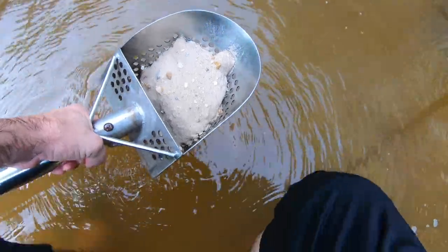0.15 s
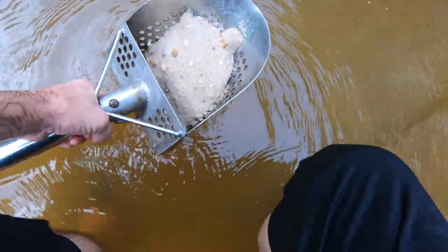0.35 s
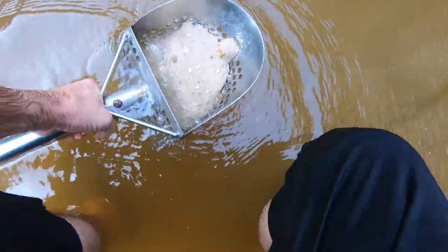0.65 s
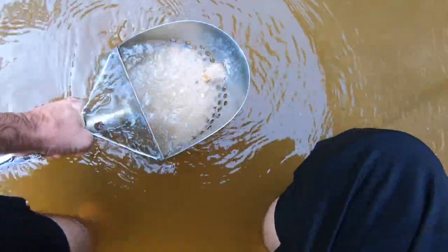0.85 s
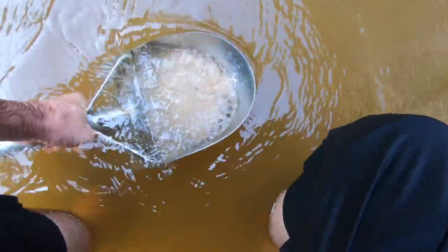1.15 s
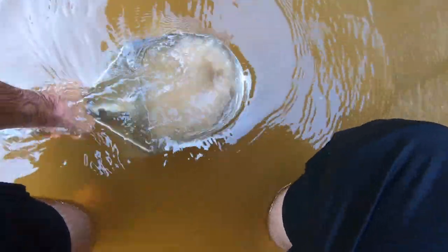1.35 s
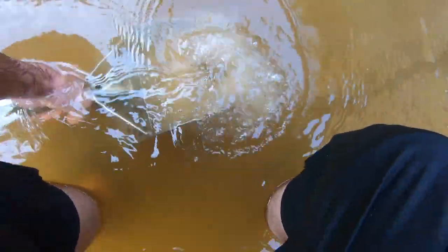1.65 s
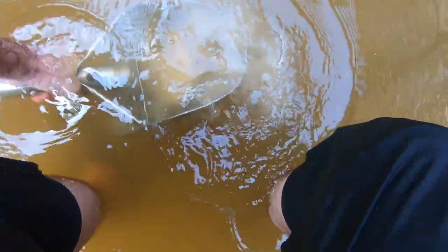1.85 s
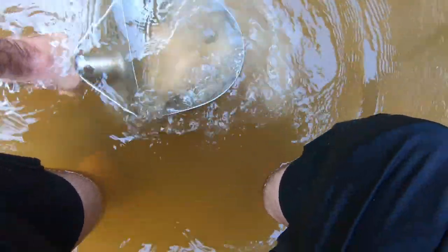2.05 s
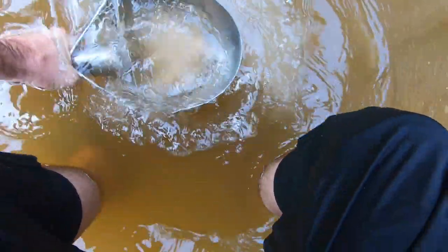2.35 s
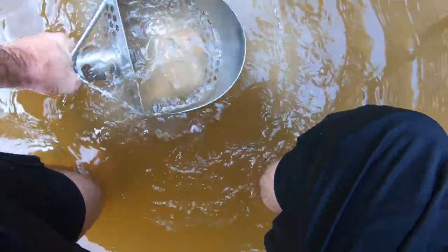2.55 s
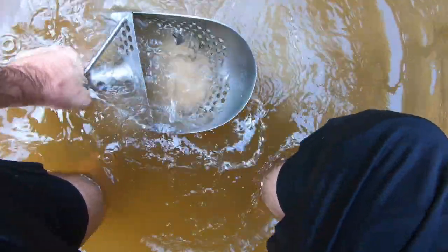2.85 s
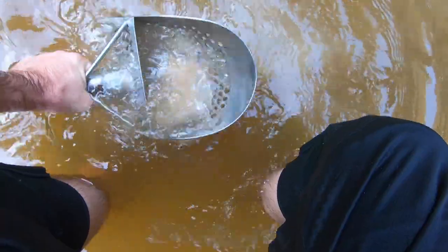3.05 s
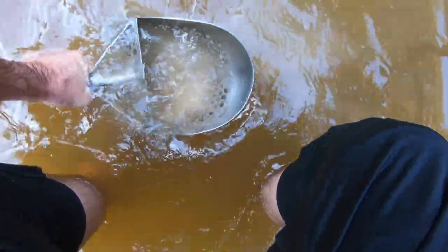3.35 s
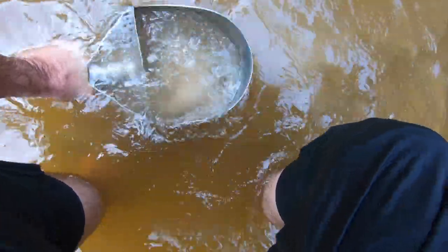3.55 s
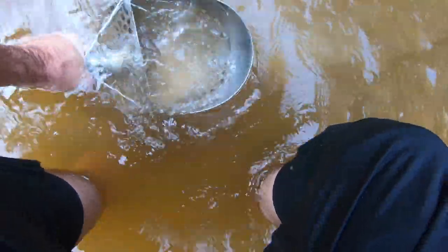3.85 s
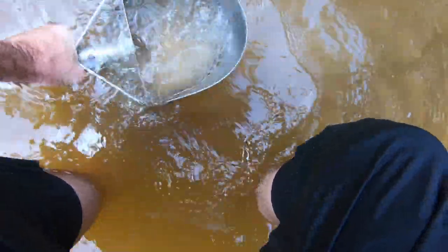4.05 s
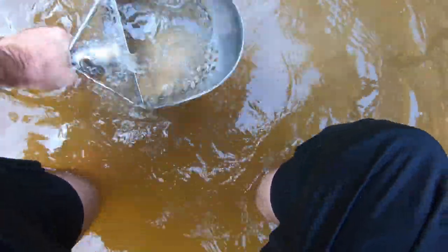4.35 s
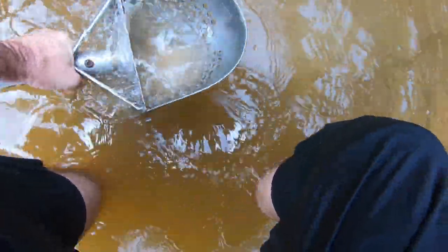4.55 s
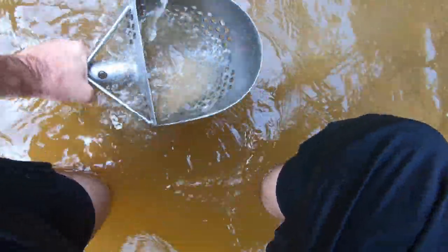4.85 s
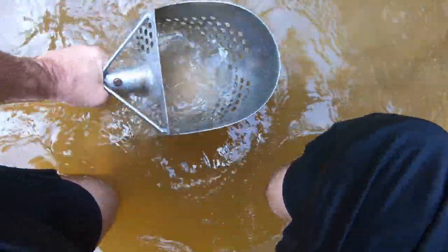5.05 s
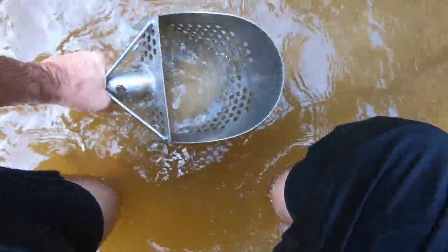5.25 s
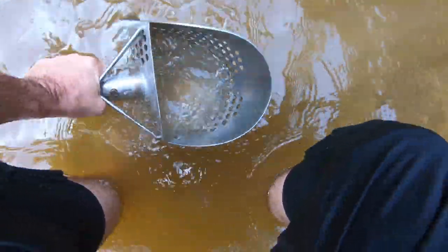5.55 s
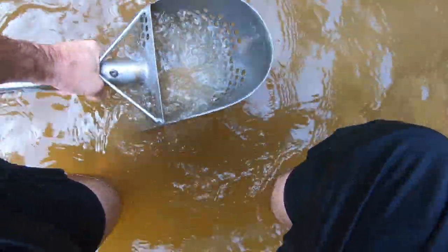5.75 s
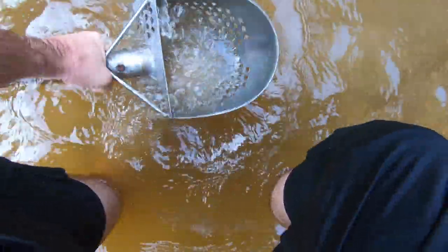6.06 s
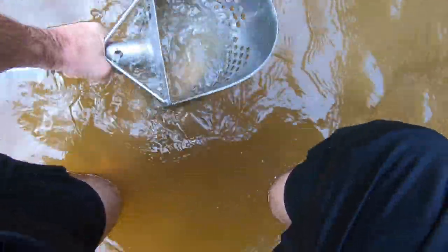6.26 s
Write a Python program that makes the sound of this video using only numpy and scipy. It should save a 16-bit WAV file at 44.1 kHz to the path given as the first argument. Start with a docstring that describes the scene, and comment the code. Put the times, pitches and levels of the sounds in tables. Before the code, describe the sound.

Outdoors, very close over shallow water. A small bird whistles briefly above faint trickles, plops and pebble ticks. After a quieter moment, trapped air gives a low falling gulp as a steel scoop goes under. Then rapid shaking begins, about eight strokes a second, each a gritty wet swish with bubbles and clicks. As the sand washes out, the scoop sounds emptier and brighter, with small metallic pings. Close stereo from a small camera, thin bass and dulled top treble.

```python
"""Outdoors in shallow water, close under a small camera with two microphone ports: a steel scoop of sand.
First a bird whistles (gliding sines) in the quiet air (shaped noise), over trickles, plops and pebble ticks.
At 1.5 s trapped air gulps (fading, gliding sines) as the scoop goes under. From 2 s it is shaken to the end:
each stroke slides sand along the perforated shell (grainy noise through resonances) among bubbles (dying
sines) and ticks (noise bursts). From 3.5 s the shell empties fast: its drum rises and bare steel pings."""
import sys
import numpy as np
from scipy import signal
from scipy.fft import rfft, irfft, next_fast_len
from scipy.io import wavfile

SR = 44100
rng = np.random.default_rng(int(sys.argv[2]) if len(sys.argv) > 2 else 0)


def wav_out(sig):
    """Save sig, one row per channel (or a flat mono array), as 16-bit PCM at SR to the path in sys.argv[1]."""
    wavfile.write(sys.argv[1], SR, np.round(np.clip(np.atleast_2d(sig).T, -1, 1) * 32767).astype(np.int16))


N = 283122
T = np.arange(N) / SR  # s
BINS = np.fft.rfftfreq(next_fast_len(N + SR // 4, real=True) // 2 * 2, 1 / SR)  # Hz, with room for tails


def undb(db):
    """Gain of a level in dB."""
    return 10 ** (np.asarray(db) / 20)


def unit(x):
    """Scale to rms 1."""
    return x / np.sqrt(np.mean(x ** 2))


def over_time(table):
    """Read a (start_s, value) table at every sample."""
    return np.interp(T, *np.transpose(table))


def along(table):
    """Read a (pitch_hz, value) table at every frequency bin."""
    hz, value = np.transpose(table)
    return np.interp(np.log(BINS + 1), np.log(hz + 1), value)


def shape(x, response):
    """Apply a frequency response given at every bin."""
    size = 2 * len(BINS) - 2
    return irfft(rfft(x, size) * response, size)[..., :N]


def add(out, s, x, pan_db):
    """Lay a short sound into both channels, pan_db louder on the left than on the right."""
    i = int(s * SR)
    x = x[..., :N - i]
    out[:, i:i + x.shape[-1]] += x * undb(np.array([[pan_db / 2], [-pan_db / 2]]))


def flicker(per_s, depth_db):
    """A gain that wanders: random levels joined by straight lines in dB."""
    knots = rng.standard_normal(int(T[-1] * per_s) + 2)
    return undb(depth_db * np.interp(T * per_s, np.arange(len(knots)), knots))


def decaying(knocks, tail_s):
    """Give each knock an exponential tail that falls to 1/e in tail_s."""
    return signal.lfilter([1], [1, -np.exp(-1 / (tail_s * SR))], knocks)


# colour of the open air: pitch_hz [Hz], level_db [dB per Hz, relative]
AIR_COLOUR = [(15, -43), (25, 4), (91, -43), (223, 1), (437, 1), (1070, -41.5), (1360, 1), (1510, -22),
              (2460, -40), (8760, 22), (15900, -40)]


def air():
    """The quiet outdoor hush: noise with a fixed colour, as two unrelated streams."""
    return undb(-68) * unit(shape(rng.standard_normal((2, N)), undb(along(AIR_COLOUR))))


def tones(tracks):
    """Sines that follow (start_s, pitch_hz, level_db) tracks."""
    out = np.zeros(N)
    for s, hz, db in map(np.transpose, tracks):
        on = (T >= s[0]) & (T < s[-1])
        phase = 2 * np.pi * np.cumsum(np.interp(T[on], s, hz)) / SR
        out[on] += np.sqrt(2) * undb(np.interp(T[on], s, db)) * np.sin(phase)
    return out


# bird whistles, one track each: start_s [s], pitch_hz [Hz], level_db [dB rms]
WHISTLES = [
    [(.022, 3140, -56), (.03, 3140, -47), (.05, 2875, -44), (.068, 3200, -46), (.082, 3480, -42),
     (.105, 2610, -51), (.122, 2630, -43), (.135, 2300, -52), (.15, 2220, -50)],
    [(.308, 2400, -62), (.315, 2410, -42), (.335, 2370, -51), (.345, 2300, -62)],
    [(.47, 2400, -54), (.478, 2570, -48), (.495, 3250, -52), (.507, 3650, -51), (.52, 2950, -50),
     (.535, 2640, -45), (.55, 2670, -44), (.56, 2800, -60)],
    [(.6, 3020, -56), (.61, 2990, -47), (.62, 2800, -56)],
    [(.705, 2620, -54), (.715, 2710, -44), (.728, 3020, -53), (.735, 3020, -61)],
    [(.655, 2350, -58), (.665, 2400, -48), (.68, 2450, -56)],
]


def bird():
    """Gliding whistles with a faint smear of echoes from the banks: noise that dies exponentially."""
    call, t = tones(WHISTLES), np.arange(int(.25 * SR)) / SR
    echo = rng.standard_normal((2, len(t))) * np.exp(-t / .06)
    out = np.array([call, call])
    add(out, .01, undb(-40) * signal.fftconvolve(call[None, :SR], echo, axes=1), 0)
    return out


# air pockets that gulp as they open: start_s [s], length_s [s], first_pitch_hz [Hz], last_pitch_hz [Hz],
# level_db [dB rms before the fade], fade_db [dB over the length], attack_s [s]
POCKETS = [(1.5105, 0.11, 363.5, 302, -16, -31.5, 0.0036), (1.617, 0.062, 304, 513, -33, -8, 0.012),
           (1.689, 0.062, 460, 690, -47.5, -14, 0.014), (1.618, 0.11, 400, 1466, -37.5, -24.5, 0.0061),
           (1.66, 0.044, 555, 690, -38.5, -13, 0.012), (1.706, 0.035, 692, 900, -50, -3, .018),
           (1.6, 0.041, 674, 877, -52.5, -6, 0.016), (1.892, 0.026, 374, 305, -44.5, -4, 0.024),
           (1.92, 0.028, 330, 370, -51.5, -7, 0.0099), (.226, 0.019, 793, 1780, -40.5, -5, 0.0042),
           (1.088, 0.025, 1300, 3620, -52.5, 4, .012), (1.362, 0.044, 1000, 808, -42.5, -27, 0.011),
           (1.972, 0.0132, 1080, 1650, -36.5, -1.5, 0.007), (1.974, .012, 2700, 2250, -41, -6, .005),
           (1.975, 0.013, 2390, 1690, -30.5, -20, 0.0054), (2.16, 0.028, 503, 640, -30, -12, .01),
           (2.163, 0.017, 1450, 1780, -27, -9, 0.0066), (4.952, 0.05, 2880, 2560, -46, 3, .01),
           (5.923, 0.049, 1670, 1660, -36, -6, 0.0051)]
RISE_BEND, FALL_BEND = 1.3, 0.45  # upward glides speed up, downward ones settle early
CLOSE_S = 0.0019  # ending time


def gulps():
    """Each pocket sounds a sine that starts, fades and glides as the pocket changes size."""
    out, wobble = np.zeros((2, N)), flicker(70, 0.84)
    for s, length, first_hz, last_hz, db, fade_db, attack in POCKETS:
        t = np.arange(int(length * SR)) / SR
        bend = RISE_BEND if last_hz > first_hz else FALL_BEND
        hz = first_hz * (last_hz / first_hz) ** ((t / length) ** bend)
        opening = np.sin(np.minimum(t / attack, 1) * np.pi / 2) ** 2
        closing = np.minimum((length - t) / CLOSE_S, 1)
        level = np.sqrt(2) * undb(db + fade_db * np.maximum(t - attack, 0) / length) * opening * closing
        level = level * wobble[int(s * SR):][:len(t)] ** (t / length)  # the pocket sputters more and more
        add(out, s, level * np.sin(2 * np.pi * np.cumsum(hz) / SR), 0)
    return out


def plop(hz, t60, glide):
    """A pinched-off bubble: a dying sine whose pitch glides near the surface; fast gliders swell first."""
    t = np.arange(int(t60 * SR) + 2) / SR
    gliding_hz = np.minimum(hz * 2 ** (glide * t / .01), 12000)
    swell = np.minimum(t / (0.00011 + 0.026 * abs(glide)), 1)
    return np.sin(2 * np.pi * np.cumsum(gliding_hz) / SR) * 1000 ** (-t / t60) * swell


# clear bubbles: start_s [s], level_db [dB, peak before decay and swell], pitch_hz [Hz],
# pan_db [dB, left minus right], t60_s [s to fade 60 dB, at least 0.004], glide [octaves per 10 ms]
PLOPS = [(0.23, -27, 2640, 1.1, 0.0062, 0.01), (0.283, -36, 2980, -2, 0.016, 0.01),
         (0.318, -26.5, 3200, 6, 0.016, 0.09), (0.615, -29.5, 2140, -1.0, 0.023, -0.056),
         (0.6357, -21.5, 2900, 2, 0.014, 0.01), (0.637, -21, 892, 1, 0.047, -0.088),
         (0.676, -42, 833, 2.7, 0.067, 0.01), (0.704, -41, 840, -1.3, 0.086, 0.04),
         (0.736, -28, 5070, 6.4, 0.011, 0.01), (0.7407, -20.5, 2600, 0.9, 0.017, 0.077),
         (0.788, -25, 2860, 2.6, 0.018, 0.01), (0.8, -36, 1560.0, 1, 0.031, 0.01),
         (0.812, -22, 3040, 1, 0.015, 0.01), (0.8475, -26.5, 3080, 2.5, 0.019, 0.083),
         (0.939, -32, 2540.0, -1.5, 0.014, 0.01), (1.343, -31.5, 2140, 1, 0.018, 0.0026),
         (1.36, -37, 3480, 7, 0.011, 0.01), (1.363, -36, 1570, 4, 0.043, 0.065),
         (1.423, -37, 3500, 7, 0.015, 0.01), (1.44, -32, 3070, -1.5, 0.03, -0.15),
         (1.4436, -31, 2020, -6, 0.024, 0.01), (1.454, -23.5, 1740, 9, 0.034, -0.047),
         (1.4868, -23, 2710, 4, 0.03, 0.01), (1.489, -16.5, 1660, 14.5, 0.015, -0.077),
         (1.504, -17.5, 1890, 0.1, 0.0067, 0.01), (1.5517, -32.5, 3250, 3, 0.022, 0.01),
         (1.702, -42, 1970, -1, 0.015, 0.01), (1.706, -42, 1400, 2, 0.03, 0.05),
         (1.45, -43, 810, 0.5, 0.04, -0.15), (2.0, -42, 746, -9, 0.1, 0.2),
         (2.05, -35.5, 715, 0, 0.25, -0.041), (2.075, -29, 926, 0.7, 0.055, -0.12),
         (2.076, -23, 2930, -2, 0.022, 0.01), (2.085, -36.5, 626, -5, 0.41, -0.02),
         (2.101, -25.5, 856, -3, 0.097, 0.1), (2.107, -27, 1290, 6, 0.046, 0.076),
         (2.12, -34.5, 580, -2.8, 0.25, 0.059), (2.13, -17, 2550, 0.6, 0.023, 0.41),
         (2.17, -24, 1480, 7, 0.027, 0.0028), (2.181, -15, 2520, 1, 0.0089, 0.01),
         (2.2, -29.5, 855, 2, 0.072, -0.11), (2.208, -24.5, 2100, -2.0, 0.015, 0.01),
         (2.253, -30.5, 475, -6, 0.14, 0.16), (2.36, -28, 884, 8, 0.044, -0.00045),
         (2.504, -24, 1760, -1, 0.037, -0.049), (2.519, -25, 1520, -4, 0.026, 0.01),
         (2.629, -24.5, 2550.0, 0, 0.023, 0.01), (2.649, -30, 910, -5, 0.034, 0.27),
         (2.682, -18, 3120, -2, 0.0093, 0.01), (2.866, -16.5, 1890, 2, 0.031, 0.21),
         (2.886, -34, 960, 4.4, 0.032, 0.2), (3.288, -34, 1700, 2.5, 0.04, 0.3),
         (2.882, -26, 3750, 1.6, 0.02, 0.01), (3.034, -31, 1970, 3, 0.039, 0.01),
         (3.1905, -9, 3270, -2, 0.0062, 0.01), (3.202, -16, 2900, -0.5, 0.016, 0.077),
         (3.217, -27.3, 1870, 7, 0.017, 0.01), (3.275, -20, 1430, 3.5, 0.039, 0.1),
         (3.394, -26.5, 937, -1, 0.06, 0.072), (3.489, -19.5, 2670, -6, 0.016, 0.01),
         (3.579, -24.5, 2900, 8, 0.018, 0.01), (3.625, -21, 2380, 4, 0.022, 0.01),
         (3.7177, -18, 2500.0, -7, 0.012, 0.01), (3.728, -22, 2200.0, 9, 0.0098, 0.01),
         (3.792, -30.5, 990, -3.5, 0.074, 0.06), (3.792, -16, 2670, -4.5, 0.011, 0.01),
         (3.839, -23, 967, -2.7, 0.069, 0.069), (3.889, -33, 817, -2, 0.18, 0.012),
         (4.03, -28, 1290, 8.5, 0.083, -0.0045), (4.078, -24.5, 1640, 7, 0.033, 0.25),
         (4.095, -16.5, 2870, 4, 0.0052, 0.01), (4.3129, -9.5, 2260, 4, 0.0033, 0.01),
         (4.386, -15.5, 3150, 5.6, 0.012, 0.01), (4.634, -12.5, 2360, 0.1, 0.013, -0.036),
         (4.78, -21, 2500, 4.2, 0.011, 0.01), (4.818, -25, 2110, 11, 0.025, 0.01),
         (4.889, -32.5, 723, -3, 0.1, 0.21), (4.923, -25, 3220, -2, 0.018, 0.01),
         (5.14, -15.5, 1910.0, 2, 0.014, 0.085), (5.274, -15, 3000, 6, 0.011, 0.01),
         (5.5712, -28, 3300, 2.0, 0.019, 0.01), (5.668, -27, 1740, 1.5, 0.02, 0.024),
         (5.995, -25, 3250, 1.5, 0.015, -0.013), (6.046, -29, 1600, -1.5, 0.02, -0.0028),
         (4.196, -33, 1590, 0.3, 0.03, 0.027), (3.864, -29, 1260, 3, 0.12, -0.026),
         (5.678, -20.5, 2060, 3.6, 0.041, 0.01), (5.699, -29.5, 1710, 1.7, 0.3, -0.04),
         (5.846, -15.5, 1586, -2, 0.04, -0.11), (5.87, -24, 2430, -3, 0.025, 0.01),
         (5.886, -25, 1540, 1, 0.026, 0.01), (5.964, -25.5, 927, -1.6, 0.054, 0.13),
         (6.025, -24.5, 1620, -5, 0.055, -0.022), (6.068, -20.5, 2270, -0.8, 0.021, 0.11),
         (6.183, -7.5, 2970, 1.2, 0.0088, 0.01), (6.411, -17, 3040, 2, 0.03, 0.01)]
CHIRP_DB, CHIRP_CYCLES = 1, 66  # larger bubbles: loudest level above the scrape, cycles to fade by 60 dB


def bubbles():
    """The clear plops, and a dense swarm of droplets and small bubbles that follows the stirring."""
    out, stir = np.zeros((2, N)), slide(trickle(), 0)
    for s, db, hz, pan_db, t60, glide in PLOPS:
        add(out, s, undb(db) * plop(hz, max(t60, .004), glide), pan_db)
    for when, size, loud, side, rise in rng.random((2000, 5)):
        hz = 650 * 2 ** (3.9 * size)
        db = 1.7 + 6.5 * loud ** 2 - 8.74 * abs(np.log2(hz / 2900))  # strongest near 2900 Hz
        drop = plop(hz, 60 / hz ** 0.92, 0.435 * (rise - .25))
        add(out, when * T[-1], stir[int(when * N)] * undb(db) * drop, 8 * (side - .4))
    for when, size, loud, side, rise in rng.random((120, 5)):
        hz = 700 * 2 ** (2.2 * size)
        chirp = plop(hz, CHIRP_CYCLES / hz, 0.16 * (rise - .2))
        add(out, when * T[-1], stir[int(when * N)] * undb(CHIRP_DB - 6.3 * loud) * chirp, 8 * (side - .4))
    return out


# pebbles on the steel: start_s [s], level_db [dB peak before panning], pan_db [dB, left minus right],
# brightness_hz [Hz], thrown_db [dB, thrown sand above the tick]
PEBBLES = [(0.284, -29, -14, 4700, -27), (0.3755, -35, -8, 5150, -16), (0.4594, -34, -0.5, 7770, -18),
           (0.5196, -26.5, -2, 6200, -20), (0.632, -18, 2, 9140, -16), (0.7353, -24.5, 1, 5600, -32),
           (0.8579, -33, -2.5, 4840, -15), (1.322, -35, -10, 9500, -23), (1.3778, -34, -8, 6030, -24),
           (1.463, -27, -2, 7870, -39), (1.485, -20.5, 0, 8020, -20), (1.506, -33, 2.5, 6660, -3),
           (1.6018, -40.5, -4, 4640, -24), (1.6326, -37, 0, 7250, -14), (1.707, -44, -1, 6940, -4.5),
           (1.735, -41, -0.5, 4630, -25), (1.8547, -55, -4, 8560, -21), (1.9734, -39.5, -2, 4580, -8),
           (2.0597, -34, -5, 6770, -3), (2.075, -28, -3, 4750, -28), (2.215, -28, -2, 4770, -7),
           (2.244, -28, 0, 4810, -18), (2.3464, -19, 1, 4860, -27), (2.503, -22.5, -4, 8300, -8),
           (2.5197, -26.5, 3, 7980, -15), (2.6555, -41, 1.0, 4820, -26), (2.676, -17.5, -2, 4680, -28),
           (2.9098, -23, -2, 4780, -20), (3.0604, -21, 0.5, 4900, -14), (3.089, -25, 3, 9060, -0.5),
           (3.1901, -8.5, 1, 8950, -31), (3.2045, -25.5, -3.5, 4620, -4), (3.421, -27, -6, 4560, -20),
           (3.4886, -21, -12, 4800, -25), (3.5603, -20.5, -4, 5710, -33), (3.7011, -18.5, -3, 4530, -18),
           (3.7286, -20, -4, 5320, -11), (3.78, -31, 0.0, 5640, -5.5), (3.9862, -23, -3, 4540, -5),
           (4.0949, -25.5, 6, 5170, -7.5), (4.6333, -17.5, -4, 4600, -16), (4.9246, -26, -3, 6800, -0.5),
           (5.0604, -32, -1.5, 4500, -18), (5.1595, -19.5, -1, 5000, -16), (5.2758, -23, -3, 6600, -27),
           (5.3582, -18.5, 0, 7750, -28), (5.439, -21.5, -5, 6650, -23), (5.5702, -39, 6, 4540, -20),
           (5.728, -24, -1, 4640, -24), (5.8477, -13.5, -1, 4730, -21), (5.887, -17, 2, 4570, -27),
           (6.0548, -19.5, 2, 5220, -13), (6.1809, -10.5, 1, 5200, -31), (6.2572, -15, -1, 7490, -33),
           (6.2917, -19, 1, 4730, -12)]


def ticks():
    """A pebble strikes: a burst of a millisecond or two, coloured round its own brightness."""
    out, t = np.zeros((2, N)), np.arange(400) / SR
    for s, db, pan_db, hz, _ in PEBBLES:
        burst = rng.standard_normal((2, len(t)))
        band = signal.butter(1, [hz / 1.6, min(hz * 1.6, 20000)], "band", fs=SR)
        # the first stream reaches both channels, so they are partly alike
        crack = signal.lfilter(*band, (burst[0] + 2.0 * burst) * np.exp(-t / 0.0018))
        add(out, s, undb(db) * crack / np.abs(crack).max(), pan_db)
    return out


def spray():
    """Loudness of the sand thrown after each tick: it starts at once and dies in hundredths of a second."""
    kick = np.zeros(N)
    for s, db, _, _, thrown_db in PEBBLES:
        kick[int(s * SR)] = undb(db + thrown_db)
    return decaying(kick, 0.011)


# the scoop fills until 3.5 s, then empties: start_s [s], share of sand in it [0 to 1]
SAND_SHARE = [(0, 0.65), (2, 0.9), (3.5, 0.94), (5, 0.26), (6.4, 0.047)]


def load():
    """Share of sand in the scoop: it damps the steel and lowers its drum."""
    return np.clip(over_time(SAND_SHARE), 0, 1)


def ring(x, modes, patchy_db):
    """Twice-applied resonances (steep skirts); each resonance wavers in level at random."""
    out = 0
    for k, (hz, width, db) in enumerate(modes):
        # each pass is wider, so that both together have the listed width
        section = np.hstack(signal.iirpeak(hz, hz / (1.55 * width), fs=SR))
        rung = signal.sosfilt([section, section], x)
        out = out + (-1) ** k * undb(db) * flicker(45, patchy_db) * rung
    return out


# resonances of the bare steel: pitch_hz [Hz], width_hz [Hz], level_db [dB, relative]
BARE_STEEL = [(1623, 41, -6.5), (2710, 60, -7), (2942, 53, -3.5), (3200, 150, -16.5)]
# loudest shell chips on the bare steel: start_s [s], level_db [dB, knock before the ring],
# pan_db [dB, left minus right]
SHELL_CHIPS = [(4.802, -22, -2), (5.163, -26, -0.6), (5.2172, -24, 2), (5.406, -25.5, -2), (5.434, -25, -3),
               (5.638, -25.5, 0), (5.8278, -27, 4), (5.8676, -24, 0.1), (5.91, -32, -2.2),
               (5.9924, -25, 1.5), (6.013, -24, 5), (6.141, -19, -1), (6.164, -19, -2.2),
               (6.238, -25.5, -3), (6.2803, -22, -3), (6.3387, -25.5, 6)]
CHIPS_PER_S, CHIP_DB = 33, -6.5  # smaller chips: mean rate, middle knock above the scrape on the empty shell


def pings():
    """Single knocks on the bare wall, ringing for a few hundredths of a second."""
    knocks = np.zeros((2, N))
    for s, db, pan_db in SHELL_CHIPS:
        add(knocks, s, undb([db]), pan_db)
    small = (rng.random(N) < CHIPS_PER_S / SR) * undb(CHIP_DB + 2.5 * rng.standard_normal(N))
    small = small * (1 - load()) * slide(trickle(), 0)
    return undb(40.0) * ring(knocks + small, BARE_STEEL, patchy_db=5.0)


# sand and water trickling between the strokes: start_s [s], scrape_db [dB],
# drum_db [dB above the scrape], wall_db [dB above the scrape]
TRICKLING = [(0, -49.5, -12.5, -4.5), (.2, -49.5, -11, -7), (.3, -45, -18, -2.5), (.42, -48.5, -14, -6),
             (.6, -46, -6.5, -5.5), (.88, -49.5, -22, -8.5), (1.12, -58, -21, -8), (1.22, -56, -4.5, 1.5),
             (1.38, -50, -28, -12), (1.47, -56, -12, -5), (1.56, -58.5, 8, -1), (1.8, -62, -5.5, 0),
             (1.93, -54.5, -18, -2.5), (2.1, -55, 0, 16), (2.3, -47, 4, 4.5), (2.45, -46, -20, 2.2),
             (3.2, -45.5, -7, -6.5), (3.6, -51, -15, -5.5), (4.0, -45.5, -15, -3.5), (4.65, -41, -15, -3.5),
             (5.35, -43, -12, -15), (5.47, -44.5, -25, -25), (5.53, -61.5, -3, -5), (5.7, -41, -12, 0),
             (6.42, -35.5, -23, -23)]


def trickle(column=1):
    """Level of the sand and water between strokes: one column of the trickling table at every sample."""
    return np.interp(T, np.transpose(TRICKLING)[0], np.transpose(TRICKLING)[column])


# shaking strokes: fastest_s [s], rise_s [s], fall_s [s], scrape_db [dB], drum_db [dB above the scrape]
SHAKES = [(2.089, 0.071, 0.076, -41, -4.5), (2.181, 0.048, 0.095, -41.5, 1), (2.349, 0.07, 0.035, -35, 0),
          (2.463, 0.052, 0.049, -35, 2.5), (2.602, 0.08, 0.049, -38, 1.5),
          (2.695, 0.026, 0.058, -34, -11.5), (2.833, 0.07, .065, -32.5, -5.5),
          (2.952, 0.062, 0.077, -32, -2.5), (3.101, 0.065, 0.076, -32, -6.5),
          (3.211, 0.033, 0.077, -35, 2.5), (3.352, .06, 0.06, -35, -6.5), (3.474, 0.044, 0.054, -39, 5.5),
          (3.592, 0.051, 0.054, -38, -4.5), (3.721, 0.049, 0.075, -35.5, -2.5),
          (3.865, 0.066, 0.077, -32, -10), (3.995, 0.082, 0.072, -34.5, -3),
          (4.149, 0.067, 0.058, -44.5, -4), (4.268, 0.056, 0.081, -35, -2), (4.45, 0.11, 0.077, -31, -13.5),
          (4.571, 0.077, 0.08, -27.5, -7), (4.707, 0.094, 0.1, -33.5, -14.5),
          (4.832, 0.056, 0.081, -30.5, -7.5), (4.955, 0.056, 0.12, -31.5, -15.5),
          (5.086, 0.063, 0.081, -32, -9), (5.222, 0.072, 0.079, -34.5, -15),
          (5.345, 0.062, 0.063, -32.5, -11), (5.415, 0.029, 0.02, -40, -17), (5.46, 0.03, .025, -43.5, -28),
          (5.627, 0.078, 0.1, -35, -15.5), (5.786, 0.1, .085, -31.5, -6), (5.96, 0.17, 0.14, -33, -18.5),
          (6.176, 0.13, 0.055, -30, -11.5), (6.31, 0.047, 0.16, -33, -20), (6.415, 0.073, .05, -34.5, -23)]
SWELL_POWER = 1.55  # loudness grows as sliding speed to this power


def slide(trickle_db, stroke_db):
    """Loudness of one layer: each stroke swells over the trickle, with narrow lulls where the scoop turns."""
    power = undb(trickle_db) ** 2
    for (s, rise, fall, db, _), extra_db in zip(SHAKES, np.broadcast_to(stroke_db, len(SHAKES))):
        near = slice(int((s - rise) * SR), int((s + fall) * SR))
        # the arm swings to and fro
        speed = np.sin(np.interp(T[near], [s - rise, s, s + fall], [0, np.pi / 2, np.pi]))
        power[near] += (undb(db + extra_db) * np.abs(speed) ** SWELL_POWER) ** 2
    return np.sqrt(power)


def grit(per_s, spread_db, tail_s, bed):
    """Loudness of grain contacts: random knocks of uneven size with short tails, over a fine bed."""
    knocks = (rng.random(N) < per_s / SR) * undb(spread_db * rng.exponential(size=N)) ** 2
    power = decaying(knocks, tail_s)
    return np.sqrt(bed + power / power.mean())


# shell resonances by the layer that drives them: pitch_hz [Hz], width_hz [Hz], level_db [dB within the layer]
# drum of the sand-filled shell, drum of the emptier shell, low thud, wall, scrape of grains, hiss of fine grains
DRUM_FULL = [(362.6, 83, 3.5), (259, 163, -26)]
DRUM_LIGHT = [(466, 82, -2.5), (365, 87, -6.5)]
LOW_THUD = [(173, 76, 0)]
SHELL_WALL = [(550, 135, -6), (874, 86, 1), (1154, 203, -7.5), (1315, 164, 3.5), (1550, 580, -4.5)]
GRAIN_SCRAPE = [(2066, 430, -2.5), (2660, 506, 1), (2902, 490, 4), (3400, 890, -3.5)]
FINE_HISS = [(4370, 910, -2), (5870, 2000, -9.5), (6870, 1020, -2.5), (7370, 650, -3), (9030, 2350, -6),
             (11000, 2500, -9), (13540, 1800, -8)]
# low thud outside the strokes: start_s [s], level_db [dB]
LOW_RUMBLE = [(0, -61), (.25, -66), (.65, -54.5), (.9, -65), (1.1, -69), (1.45, -66), (2, -67.5),
              (3.3, -66), (6.42, -73)]
STROKE_WALL_DB, STROKE_HISS_DB, STROKE_THUD_DB = -5.5, -3.5, -32.5  # above the scrape; wall at a -6 dB drum
WALL_PER_DRUM = 0.17  # strokes that beat the drum harder also ring the wall more (dB per dB)
# hiss above a -47 dB scrape, and its change per dB: steady background hiss shows more when the trickle is faint
TRICKLE_HISS_DB, HISS_PER_DB = -2.5, -0.0259


def sand():
    """Grains knock along the shell; coarse lumps beat its drum, fine ones scrape and hiss (two streams)."""
    base_db, stroke_drum_db = trickle(), np.transpose(SHAKES)[4]
    stroke_wall_db = STROKE_WALL_DB + WALL_PER_DRUM * (stroke_drum_db + 6)
    hiss_db = base_db + TRICKLE_HISS_DB + HISS_PER_DB * (base_db + 47)
    drum = slide(base_db + trickle(column=2), stroke_drum_db)
    thud = slide(over_time(LOW_RUMBLE), STROKE_THUD_DB)
    wall = slide(base_db + trickle(column=3), stroke_wall_db)
    scrape = slide(base_db, 0)
    hiss = slide(hiss_db, STROKE_HISS_DB)
    coarse = grit(per_s=70, spread_db=1.5, tail_s=0.0044, bed=1.0)
    medium = grit(per_s=330, spread_db=2.5, tail_s=0.001, bed=1.0)
    fine = grit(per_s=540, spread_db=2.0, tail_s=0.0014, bed=0.68)
    full, thrown = load(), spray()
    # sand damps the steel: the barer the shell, the higher its drum and the clearer its ring
    layers = [  # resonances, loudness, grain, gain, share of the thrown sand
        (DRUM_FULL, drum, coarse, np.sqrt(full), 0),
        (DRUM_LIGHT, drum, coarse, np.sqrt(1 - full), 0),
        (LOW_THUD, thud, coarse, 1, 0),
        (SHELL_WALL, wall, medium, 1, .4),
        (GRAIN_SCRAPE, scrape, np.sqrt(medium * fine), .8, 1),
        (BARE_STEEL, scrape, medium, 0.32 * (1 - full), .6),
        (FINE_HISS, hiss, fine, 1, .7)]
    out = 0
    for modes, loudness, grain, gain, throw in layers:
        patchy_db = min(2.2, 0.0045 * modes[0][0])  # low layers waver less
        rung = unit(ring(grain * rng.standard_normal((2, N)), modes, patchy_db))
        out = out + gain * np.hypot(loudness, throw * thrown) * rung
    return out


# likeness of a spread source at the two microphone ports: pitch_hz [Hz], share in common [0 to 1]
PORT_LIKENESS = [(60, .2), (130, 0.31), (200, 0.64), (290, 0.99), (450, 0.95), (700, 0.57), (1000, 0.67),
                 (1400, 0.28), (2200, 0.72), (3100, 0.95), (4500, 0.68), (6800, 0.15), (15000, 0.11)]


def pair(first, second):
    """Blend two unrelated sounds into a pair as alike as the ports hear a spread source."""
    like = np.clip(along(PORT_LIKENESS), 0, 1)
    mid = shape(first, np.sqrt((1 + like) / 2))
    side = shape(second, np.sqrt((1 - like) / 2))
    return np.array([mid + side, mid - side])


# lead of the left port: pitch_hz [Hz], lead [turns of phase]
PORT_LEAD = [(500, 0), (860, .08), (1290, .33), (1550, .8), (2240, .88), (2600, 1), (6000, 1), (8000, 1.15),
             (11000, 1.3), (13000, 1)]
# balance of the ports: pitch_hz [Hz], pan_db [dB, left minus right]
PORT_TILT = [(100, -0.5), (400, -1.5), (1290, 2), (2400, 0), (4400, 2), (8100, -2), (15000, 0.5)]


def scene():
    """Everything reaches the two ports with a lead and a balance that change with pitch."""
    spread = pair(*(air() + sand()))
    near = spread + bird() + gulps() + bubbles() + ticks() + pings()
    turn = np.exp(1j * np.pi * along(PORT_LEAD)) * undb(along(PORT_TILT) / 2)
    return shape(near, np.array([turn, 1 / turn]))


# treble loss of the microphone cover: pitch_hz [Hz], level_db [dB]
COVER_LOSS = [(9500, -0.5), (11500, -12.5), (14000, -15.5), (15800, -20)]
TOP_HZ = 15800


def record(dry):
    """The camera cuts the bass steeply, adds a faint low murmur, dulls the high treble and cuts the top."""
    murmur_band = signal.butter(1, [12, 90], "band", fs=SR)
    murmur = signal.lfilter(*murmur_band, rng.standard_normal(dry.shape))
    murmur = unit(murmur + 0.15 * murmur[::-1])  # each port shares a little of the other
    sound = signal.sosfilt(signal.butter(8, 135, "high", fs=SR, output="sos"), dry)
    sound = shape(sound + undb(-79.5) * murmur, undb(along(COVER_LOSS)))
    return signal.sosfilt(signal.ellip(10, .2, 80, TOP_HZ, fs=SR, output="sos"), sound)


dry = scene()
out = record(dry)
wav_out(out)
```